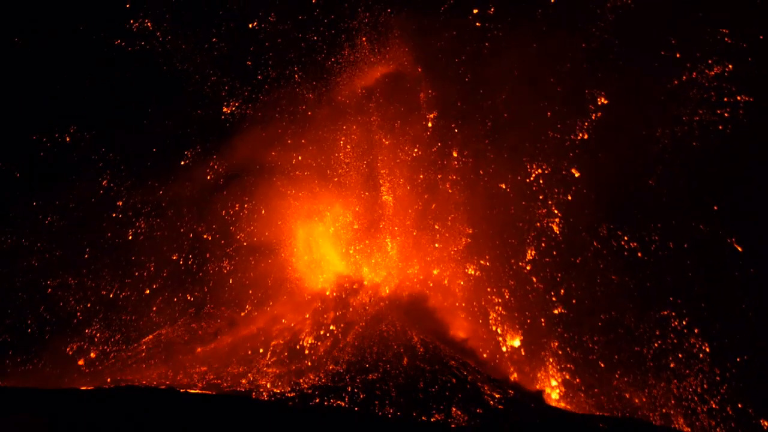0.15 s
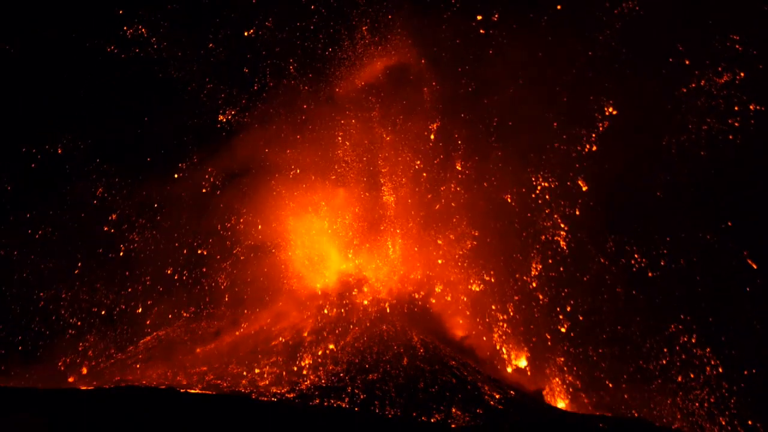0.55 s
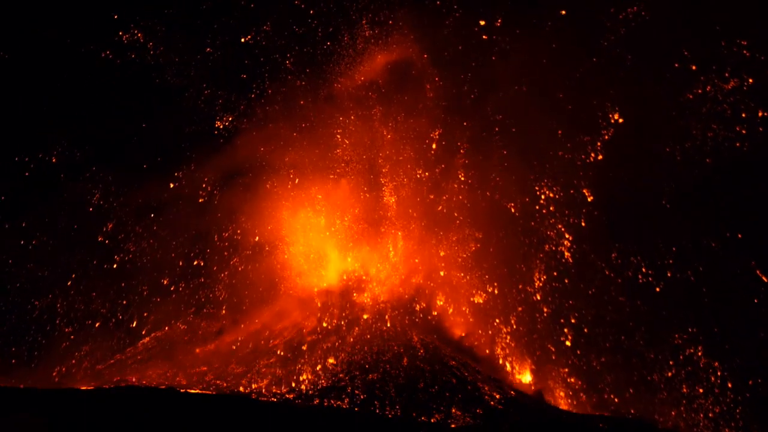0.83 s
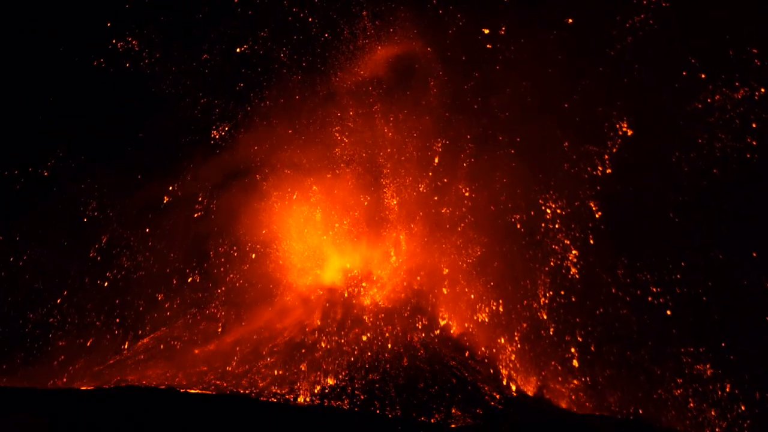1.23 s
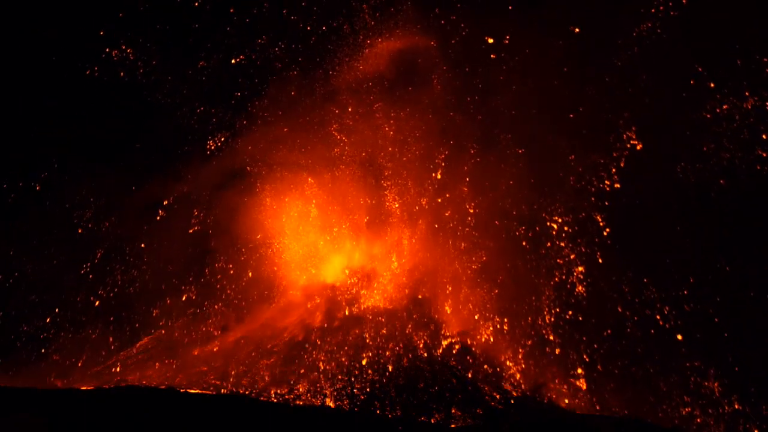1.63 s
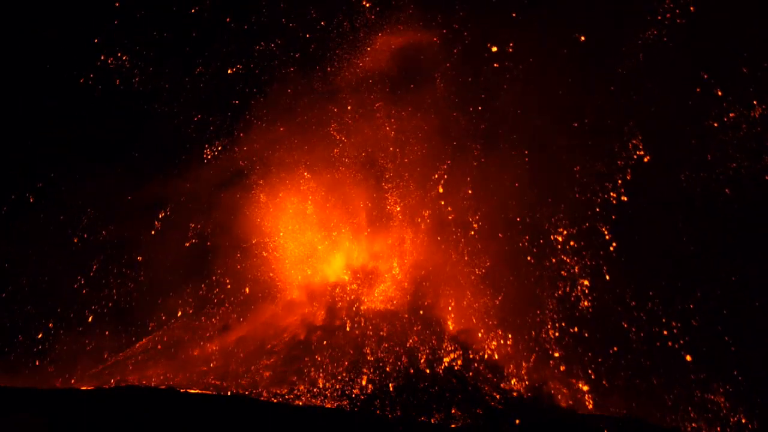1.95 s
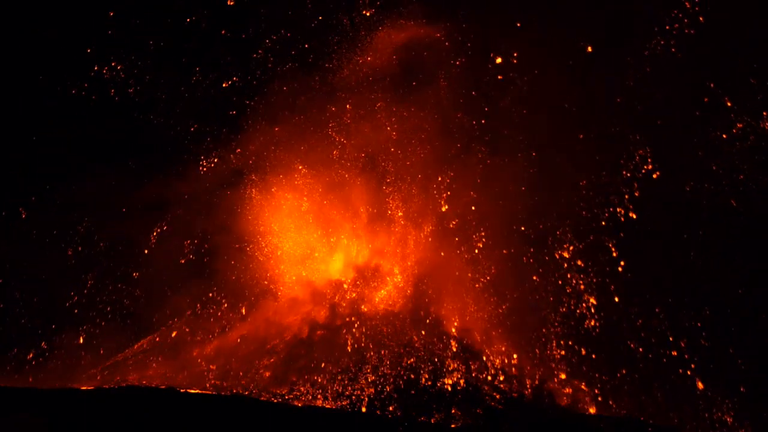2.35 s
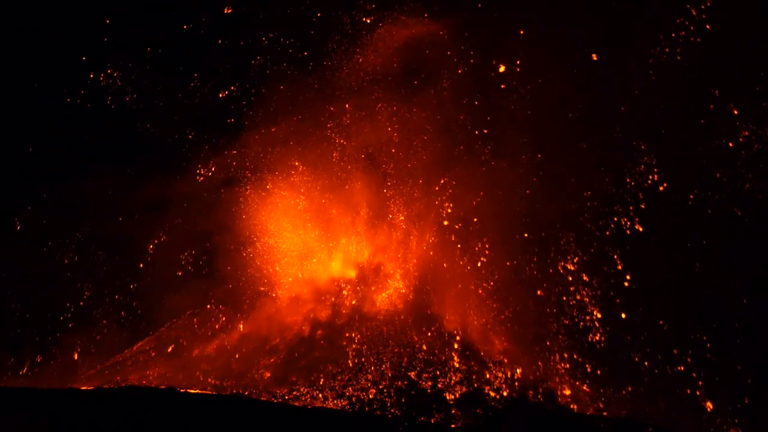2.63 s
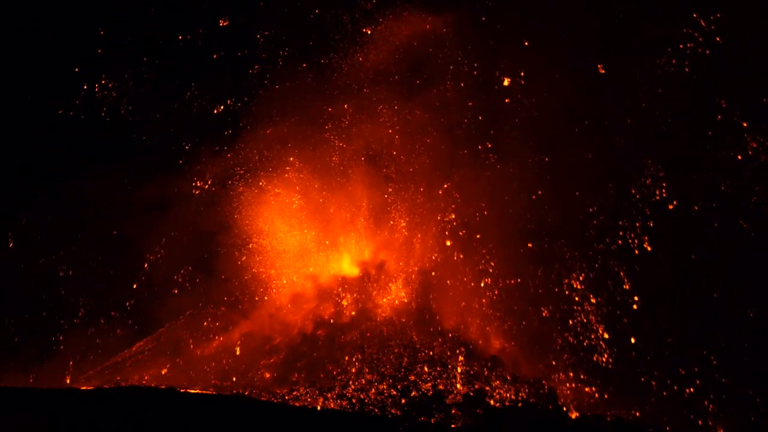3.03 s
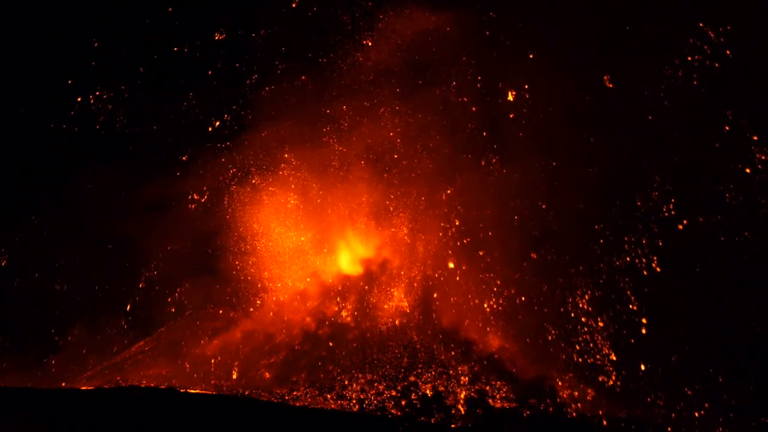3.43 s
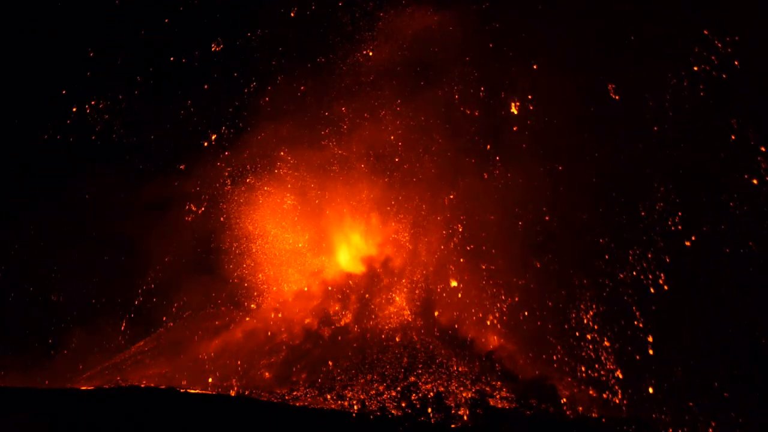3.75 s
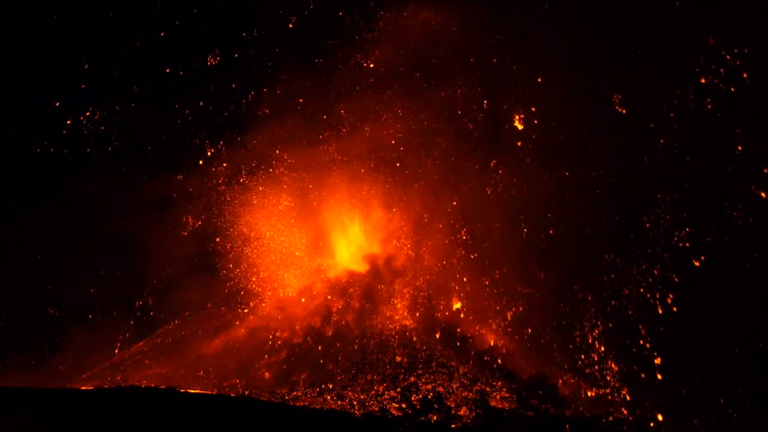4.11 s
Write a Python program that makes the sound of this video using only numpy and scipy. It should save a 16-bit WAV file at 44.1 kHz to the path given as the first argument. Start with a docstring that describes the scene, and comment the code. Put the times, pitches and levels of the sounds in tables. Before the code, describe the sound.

Steady dull volcanic roar from far away, slightly raised at first, sinking, then surging strongly near the end over thuds and sparse ticking grit.

```python
"""A lava fountain roars far off across a mountainside at night; the air has taken away all its treble.
At first the gas jet is a little raised and grit ticks and trickles close by; then the roar sinks.
Dull thuds of bursting gas follow, a few late ticks, and near the end one big surge that fades again.
Fountain, microphone hiss and a thin high whine are shaped noise; thuds and ticks are damped swings."""
import sys
import numpy as np
from scipy import signal
from scipy.io import wavfile
from scipy.ndimage import uniform_filter1d

SR = 44100
rng = np.random.default_rng(int(sys.argv[2]) if len(sys.argv) > 2 else 0)


def ratio(d):
    """dB to gain"""
    e = np.asarray(d, float) / 20
    return 10 ** e


def store_wav(level_fs):
    """Save 16-bit WAV to argv[1]."""
    pcm = np.round(np.clip(np.atleast_2d(level_fs), -1, 1) * 32767)
    wavfile.write(sys.argv[1], SR, pcm.T.astype(np.int16))


N = 188557  # length in samples


def evened(x):
    """Scales to rms 1."""
    return x / np.sqrt(np.mean(x ** 2) + 1e-20)


def read(points, hz):
    """Reads a table of values against pitch, along log frequency."""
    f, value = np.transpose(points)
    return np.interp(np.log(hz + 1), np.log(f + 1), value)


def along(rows, column):
    """Reads a table column at every sample; the first column is time in seconds."""
    rows = np.array(rows)
    return np.interp(np.arange(N) / SR, rows[:, 0], rows[:, column])


def noise(spectrum, likeness, patchy_db):
    """Stereo noise of rms 1 whose colour drifts in patches of time and pitch."""
    size = 2048
    hop = size // 4
    hz = np.fft.rfftfreq(size, 1 / SR)
    frames = N // hop + 6
    a, b, c, d, patches = rng.standard_normal((frames, len(hz), 5)).T
    patches = uniform_filter1d(patches, size=8, axis=0)  # smooth over pitch
    patches = evened(uniform_filter1d(patches, size=6, axis=1))  # smooth over time
    same = np.clip(read(likeness, hz), -1, 1)[:, None]
    left = a + 1j * b
    right = same * left + np.sqrt(1 - same ** 2) * (c + 1j * d)
    colour = ratio(read(spectrum, hz)[:, None] + patchy_db * patches)
    sound = signal.istft(np.array([left, right]) * colour, nperseg=size, noverlap=size - hop)[1]
    return evened(sound[:, size:size + N])


def bursts(events, turns, rise, phase, wobble):
    """Each event is a short damped swing; turns (decay) and rise are in cycles, phases in radians."""
    out = np.zeros(N)
    chances = rng.standard_normal(len(events))
    for (s, db, hz), chance in zip(events, chances):
        cycle = np.arange(round(6 * turns * SR / hz)) * hz / SR
        shape = (1 - np.exp(-cycle / rise)) * np.exp(-cycle / turns)
        swing = shape * np.sin(2 * np.pi * cycle + phase + wobble * chance)
        start = round(s * SR)
        out[start:start + len(swing)] += ratio(db) * swing / abs(swing).max()
    return out


CALM_DB = -34  # the roar's level between surges
# Surges of the gas jet. Each row: start in seconds, rise in seconds, hold in seconds, gain in dB.
JET_SURGES = [(0, 0.018, 0.65, 2.97), (2.78, 0.4, .55, 10.86)]


def surging():
    """Level of the roar in dB: each surge climbs, holds and fades at a steady rate."""
    fade_db_per_s = 18.5
    t = np.arange(N) / SR
    level_db = np.full(N, float(CALM_DB))
    for start, rise, hold, gain_db in JET_SURGES:
        top, end = start + rise, start + rise + hold
        silent = end + gain_db / fade_db_per_s  # the surge's gain is used up here
        level_db += np.interp(t, [start, top, end, silent], [0, gain_db, gain_db, 0])
    return level_db


# How alike the far sound is left and right. Each row: pitch in Hz, likeness (1 means identical).
FAR_LIKENESS = [(35, 0.94), (65, .99), (140, 1), (400, 0.99), (800, 0.99), (1500, 0.98)]
# Colour of the jet's roar. Each row: pitch in Hz, strength in dB per Hz (relative).
ROAR_COLOUR = [(70, -100), (120, -29.5), (190, -3.5), (300, 0), (410, -3.5), (530, -5.5), (680, -13.5),
               (880, -24.5), (1200, -53), (1800, -85), (3000, -120)]


def roar():
    """Turbulent gas in the jet: mid-low noise that swells with each surge."""
    return ratio(surging()) * noise(ROAR_COLOUR, FAR_LIKENESS, patchy_db=0.42)


# Colour of the rush, dulled by distance. Each row: pitch in Hz, strength in dB per Hz (relative).
RUSH_COLOUR = [(15, -46.5), (30, -18), (50, -8), (80, -7), (250, -16), (450, -4), (650, 0), (800, -1),
               (1000, -9), (1300, -21.5), (1700, -38.5), (2200, -57.5), (4000, -100)]


def rush():
    """Spray, falling clots and ground shake: noise that follows the surges only a little."""
    calm_rush_db, follows = -39, 0.084  # follows: share of each surge's gain in dB
    level_db = calm_rush_db + follows * (surging() - CALM_DB)
    return ratio(level_db) * noise(RUSH_COLOUR, FAR_LIKENESS, patchy_db=1.25)


# Colour of the low rumble. Each row: pitch in Hz, strength in dB per Hz (relative).
RUMBLE_COLOUR = [(15, -85.5), (25, -59), (40, -38), (65, -10), (100, -2), (150, 2), (200, -2), (280, -22.5),
                 (400, -65), (700, -120)]
# How the rumble heaves. Each row: time in seconds, level in dB.
RUMBLE_HEAVE = [(0, -31.5), (.42, -30.5), (.75, -33), (1.05, -32.5), (1.65, -34.5), (2.15, -29.5),
                (2.45, -33), (2.95, -34), (3.1, -27.5), (3.4, -30), (3.68, -24), (3.9, -30.5), (4.1, -28.5),
                (4.28, -32.5)]


def rumble():
    """The deep part of the turbulent gas: low noise that heaves on its own."""
    return ratio(along(RUMBLE_HEAVE, column=1)) * noise(RUMBLE_COLOUR, FAR_LIKENESS, patchy_db=2.5)


# Gas slugs bursting in the vent.
# Each row: start in seconds, peak in dB before distance softens it, pitch in Hz.
GAS_THUDS = [(1.195, -19.5, 120), (1.209, -19, 152), (2.651, -14, 166), (3.699, -14.5, 174)]


def thuds():
    """Each bursting gas slug gives one damped low swing, rounded off by distance."""
    far = signal.butter(3, [70, 450], "bandpass", fs=SR, output="sos")
    return signal.sosfilt(far, bursts(GAS_THUDS, turns=0.68, rise=0.6, phase=3.0, wobble=0.1))


# Grit ticking near the microphone. Each row: start in seconds, peak in dB before its echo, pitch in Hz.
GRIT_TICKS = [(.2113, -49, 2600), (.2358, -50, 2900), (.2386, -56, 2800), (.2678, -51, 3000),
              (.2782, -54, 2800), (.424, -57, 2200), (.4728, -54.5, 2500), (.6628, -55, 2700),
              (.806, -60, 3200), (.8455, -43.5, 4200), (.8632, -51, 4600), (1.9107, -53, 3300),
              (2.1989, -60, 3000), (2.7636, -57.5, 3250), (2.8649, -57, 3640), (3.0723, -47, 2100),
              (3.3777, -51, 2600)]


def ticks():
    """Single grains strike as tiny damped swings, each with a close echo off the ground."""
    direct = bursts(GRIT_TICKS, turns=0.55, rise=0.5, phase=0.0, wobble=0.39)
    echo = ratio(-5.0) * np.roll(direct, round(0.001 * SR))  # 1 ms later
    return direct + echo


# Trickling grit. Each row: time in seconds, level in dB.
TRICKLE_LEVEL = [(0, -85), (.6, -80), (.76, -78), (.92, -77), (1.02, -90.5), (4.28, -92.5)]


def trickle():
    """Tiny grains fall at random, uneven in strength, heard in much the same range as the ticks."""
    grains_per_s = 600
    strength = ratio(3.5 * np.minimum(rng.exponential(1, N), 3.5))
    falls = rng.random(N) < grains_per_s / SR
    grains = strength * falls * rng.choice([-1, 1], N)
    band = signal.butter(2, [1700, 2900], "bandpass", fs=SR, output="sos")
    return ratio(along(TRICKLE_LEVEL, column=1)) * evened(signal.sosfilt(band, grains))


# Colour of the hiss. Each row: pitch in Hz, strength in dB per Hz (relative).
HISS_COLOUR = [(500, -0.5), (2000, -0.5), (4600, -3.5), (11400, -5.5), (12800, -2.5), (13450, -1.5),
               (13650, -13), (13800, -24), (14400, -26)]
# How alike the hiss is left and right. Each row: pitch in Hz, likeness (1 means identical).
HISS_LIKENESS = [(2000, 0.55), (5000, 0.62), (9000, 0.55), (14000, .45)]


def hiss():
    """The microphone's own faint, steady noise."""
    return ratio(-72) * noise(HISS_COLOUR, HISS_LIKENESS, patchy_db=0.5)


def whine():
    """A fuzzy high whistle, narrow noise moved up in pitch, that wavers alike in both channels."""
    pitch_hz, width_hz, level_db = 12950, 100, -93
    a, b, slow = rng.standard_normal((N, 3)).T
    r = np.exp(-np.pi * width_hz / SR)
    fuzz = signal.lfilter([1], [1, -2 * r, r * r], a + 1j * b)
    carrier = np.exp(2j * np.pi * pitch_hz * np.arange(N) / SR)
    waver = evened(uniform_filter1d(slow, size=5000))
    return ratio(level_db + 2.5 * waver) * evened((fuzz * carrier).real)


def scene():
    """The far fountain and the near grit, a little to the right."""
    lean_db = -0.32  # left over right
    fountain = roar() + rush() + rumble() + thuds()
    grit = ticks() + trickle()
    return (fountain + grit) * ratio(np.array([[lean_db / 2], [-lean_db / 2]]))


def roll_off(x):
    """The treble ends steeply here."""
    return signal.sosfilt(signal.butter(12, 14340, fs=SR, output="sos"), x)


def record(dry):
    """The deepest bass falls away; hiss and whine join in."""
    bass_cut = signal.butter(2, 45, "highpass", fs=SR, output="sos")
    mix = signal.sosfilt(bass_cut, dry) + hiss() + whine()
    return roll_off(mix)


dry = scene()
out = record(dry)
store_wav(out)
```